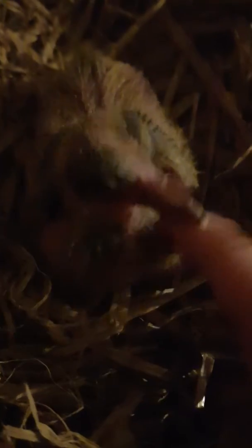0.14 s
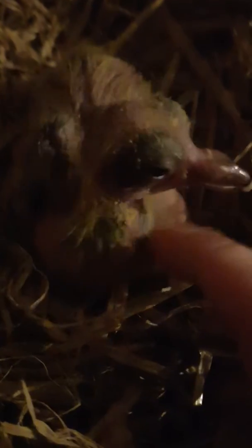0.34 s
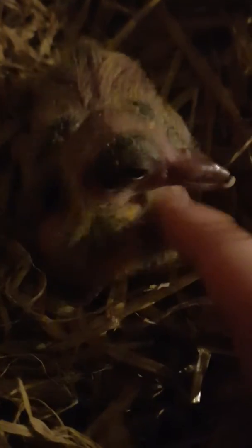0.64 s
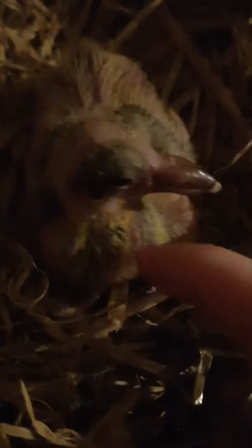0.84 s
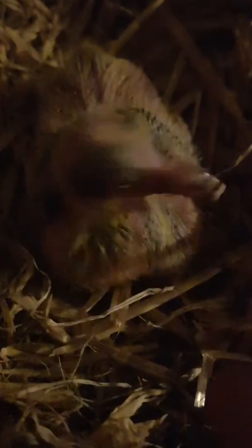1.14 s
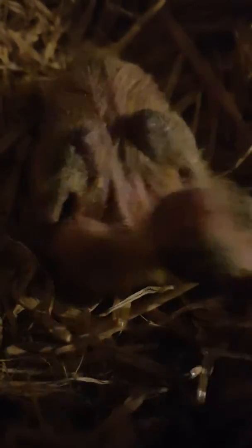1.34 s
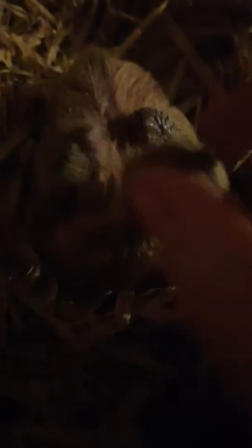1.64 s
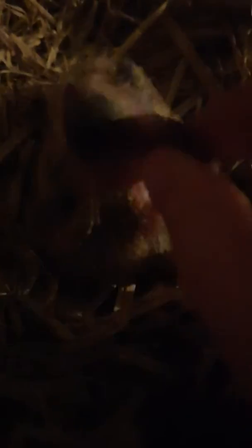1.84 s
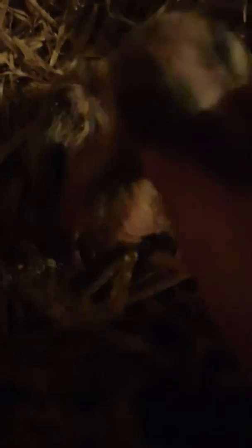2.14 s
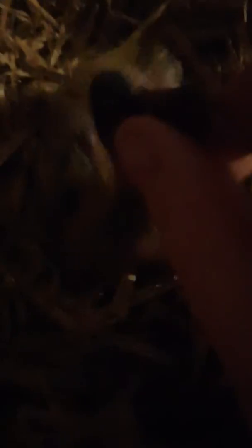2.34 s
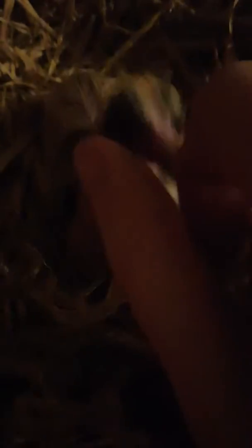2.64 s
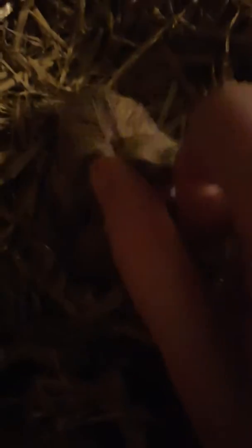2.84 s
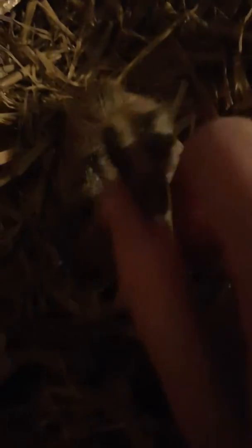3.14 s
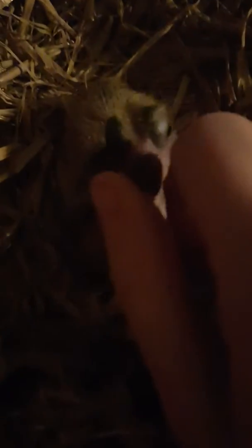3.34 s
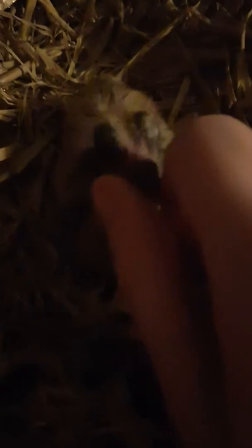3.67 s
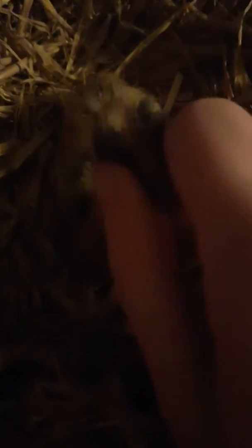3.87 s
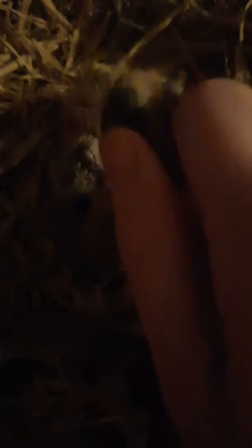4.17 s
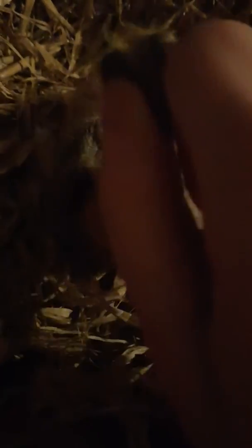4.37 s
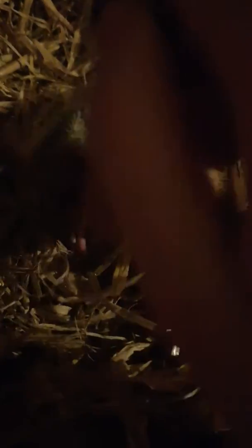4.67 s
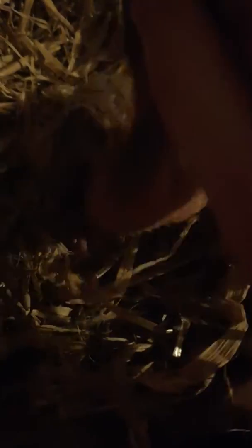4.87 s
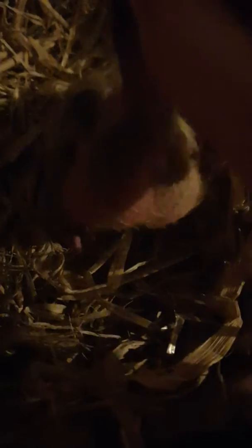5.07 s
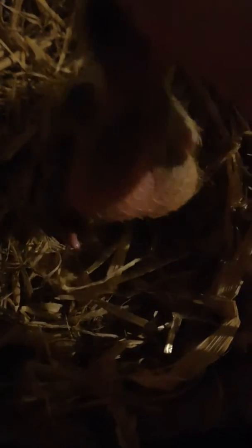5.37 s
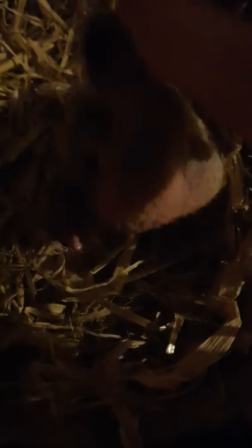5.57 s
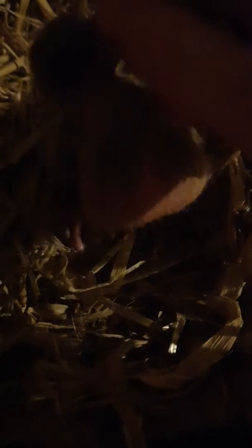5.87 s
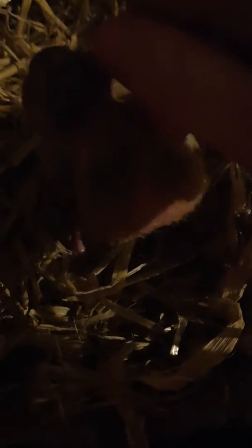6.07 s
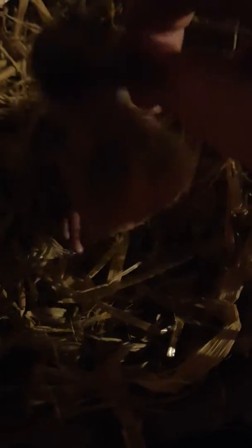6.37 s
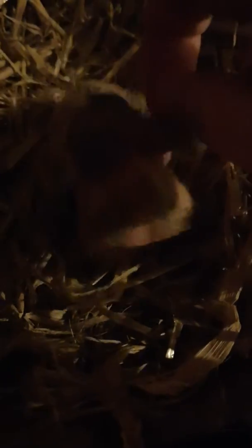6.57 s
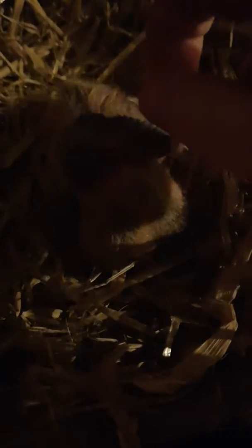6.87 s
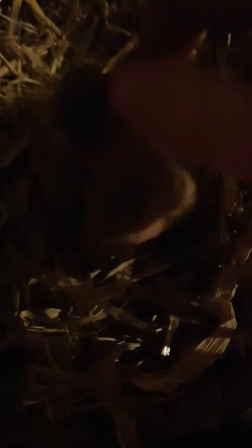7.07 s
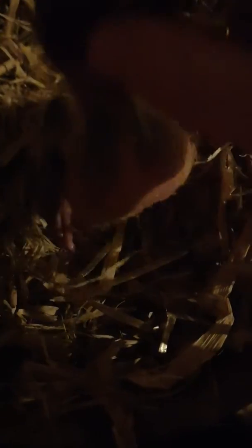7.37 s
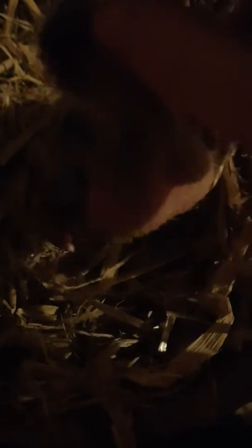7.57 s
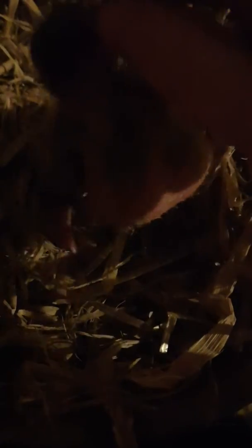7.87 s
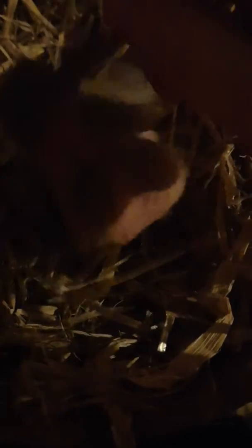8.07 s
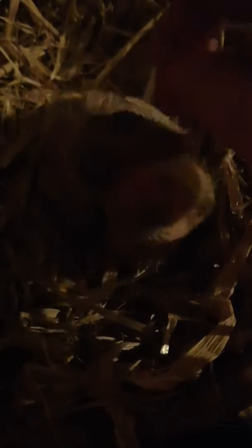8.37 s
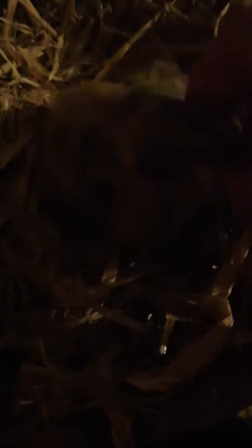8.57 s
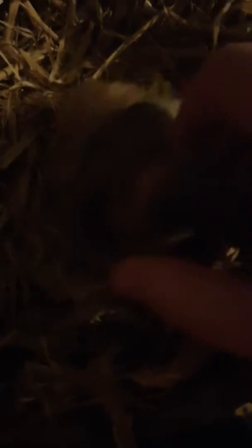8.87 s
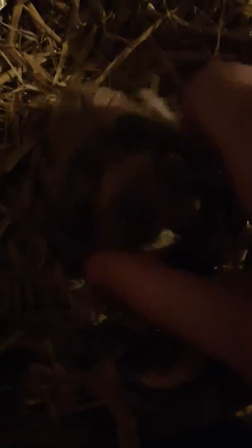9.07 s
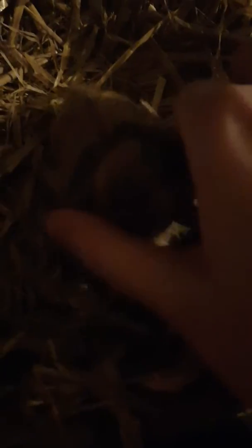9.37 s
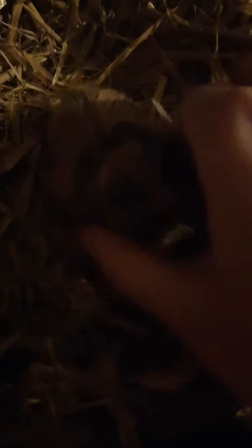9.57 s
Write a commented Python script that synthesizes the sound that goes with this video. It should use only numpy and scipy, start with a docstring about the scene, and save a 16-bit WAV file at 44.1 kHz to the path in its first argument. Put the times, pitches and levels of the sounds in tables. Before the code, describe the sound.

A pigeon chick squeaks close to the microphone in a small room, a little to the left, over a faint, steady machine drone. Each squeak is a high, thin, slightly hoarse peep of about a quarter second that rises, warbles and sags. One comes at 0.3 seconds; after a pause, a run starts at 1.2 seconds and carries on at about two a second until 8.9. The loudest fall around 1.7 to 2.3 seconds and just after 7, with softer ones near 5 and 8.3. A last brief, weak peep comes at 9.7 seconds. From about 1.5 seconds the straw nest crackles faintly as the chick shuffles, with short slides near 2.9, 3.5, 4 and 6.9 seconds. Small dry clicks occur near 2, 5, 6.6 and 8.7 seconds. A hand softly bumps the microphone around 2.2 to 2.4 seconds and again at 3.3.

```python
"""A pigeon chick squeaks in a straw nest in a small room, close to a phone held upright.
The two halves of its voice box (the syrinx) sound at once: they lock together, beat or turn hoarse.
A machine drones steadily in the background. Straw crackles and slides as the chick shuffles,
the beak or the straw gives short dry clicks, and now and then the hand bumps the phone.
The phone's two microphones give left and right."""
import sys
import numpy as np
from scipy import signal
from scipy.fft import rfft, irfft
from scipy.io import wavfile
from scipy.ndimage import uniform_filter1d

SR = 44100
rng = np.random.default_rng(int(sys.argv[2]) if len(sys.argv) > 2 else 0)


def master(y):
    """Save y as 16-bit WAV."""
    cut = np.clip(np.atleast_2d(y).T, -1, 1)
    pcm = np.round(cut * 32767)  # scale
    wavfile.write(sys.argv[1], SR, pcm.astype(np.int16))


N = 428652


def amp(db):
    return 10 ** (np.asarray(db) / 20)


def unit_rms(x):
    return x / np.sqrt(np.mean(abs(x) ** 2) + 1e-20)


def curve_at(points, hz):
    """Look up a table on a log-frequency axis."""
    f, value = np.transpose(points)
    return np.interp(np.log(hz + 1), np.log(f + 1), value)


def add(mix, start, sound):
    part = mix[..., round(start * SR):][..., :sound.shape[-1]]
    part += sound[..., :part.shape[-1]]


def wobble(size, hz):
    """A smooth random wiggle, about 1 in size, no faster than about hz."""
    lowpass = signal.butter(2, hz, fs=SR, output="sos")
    return unit_rms(signal.sosfilt(lowpass, rng.standard_normal(size + 999))[999:])


def band(x, hz, octaves):
    """Keep a bell-shaped band around hz."""
    f = np.fft.rfftfreq(x.shape[-1], 1 / SR) + 1
    return irfft(rfft(x) * np.exp(-.5 * (np.log2(f / hz) / octaves) ** 2), x.shape[-1])


def during(t, start, end):
    """1 from start to end, with soft edges."""
    return np.clip(np.minimum(t - start, end - t) / .004, 0, 1)


# Tone colour of the machine's noise: f/Hz, relative level/dB
DRONE_COLOUR = [(25, -18.5), (102, -10.5), (185, -7.5), (503, -14.5), (887, -12), (1370, -26),
                (1940, -23.5), (3100, -38), (4000, -36.5), (6300, -58), (8200, -59.5), (12500, -52),
                (16000, -46.5)]
# Humps on top of that noise: f/Hz, width/Hz, relative level/dB
DRONE_HUMPS = [(102.4, 7.5, -59.5), (506.3, 94, -49), (372.4, 120, -54.5)]
# How alike left and right are: f/Hz, likeness (0-1, capped below)
DRONE_LIKENESS = [(60, 1), (500, 0.92), (1000, 0.1), (2500, 0.033)]
# How much louder the left is: f/Hz, level/dB
DRONE_BALANCE = [(240, 0.5), (950, -2.5), (1900, -10), (4400, -17), (8000, 6.5), (15000, 6)]


def drone():
    """A machine makes steady airy noise, alike on both sides only in the bass."""
    frames, hz = N // 1024 + 5, np.fft.rfftfreq(4096, 1 / SR)
    a, b, c, d = rng.standard_normal((frames, 2049, 4)).T
    wash = amp(2 * curve_at(DRONE_COLOUR, hz))
    power = amp(-50) ** 2 * wash / wash.sum()
    for centre, width, db in DRONE_HUMPS:
        hump = 1 / (1 + (2 * (hz - centre) / width) ** 2) ** 2
        power += amp(db) ** 2 * hump / hump.sum()
    alike = np.clip(curve_at(DRONE_LIKENESS, hz), 0, .87)[:, None]
    left = a + 1j * b
    right = alike * left + np.sqrt(1 - alike ** 2) * (c + 1j * d)
    tilt = amp(curve_at(DRONE_BALANCE, hz) / 2)[:, None]
    delay = np.exp(-2j * np.pi * hz * 0.00025)[:, None]  # the machine is nearer the right side
    spectra = np.array([left * tilt * delay, right / tilt]) * np.sqrt(power[:, None] * 2 / (1 + alike))
    noise = signal.istft(spectra, nperseg=4096, noverlap=3072)[1][:, :N]
    return unit_rms(noise) * np.sqrt(power.sum()) * amp(-1.12)


# How strongly the nest crackles: t/s, relative level/dB
SHUFFLE_LEVELS = [(1.15, -74), (1.6, -61.5), (3.6, -70), (4.25, -61), (4.7, -69.5), (5.0, -63.5),
                  (6.05, -70.5), (6.53, -59.5), (6.95, -70.5), (7.5, -60.5), (8.4, -66), (8.999, -59.5),
                  (9.25, -73.5), (9.55, -65.5)]


def nest_shuffle():
    """The shuffling chick keeps the straw crackling finely, differently on each side."""
    grains = rng.standard_normal((2, N)) * amp(1.4 * wobble(N, hz=150))
    level_db = np.interp(np.arange(N) / SR, *np.transpose(SHUFFLE_LEVELS)) + 0.96 * wobble(N, hz=12)
    crackle = unit_rms(band(grains, hz=4480, octaves=0.4))
    fizz = unit_rms(band(grains, hz=11470, octaves=0.38))
    return amp(level_db) * (crackle + amp(-4.5) * fizz)


# Path of the upper voice, one list per squeak: t/s, level/dB, f/Hz
UPPER_WARBLES = [
    [(.277, -36.5, 4100), (.29, -34.5, 5140), (.33, -40, 5970), (.35, -35, 5470), (.375, -38.5, 6400),
     (.41, -30.5, 5300), (.445, -31.5, 5890), (.465, -32, 5300), (.49, -36, 6710), (.515, -27, 4900),
     (.532, -25, 4510)],
    [(1.263, -32.5, 4330), (1.29, -35.5, 4460), (1.325, -36.5, 5970), (1.345, -37, 5140),
     (1.39, -35.5, 5450), (1.415, -31.5, 5050), (1.44, -33.5, 6600), (1.465, -36, 5240), (1.495, -29, 5200),
     (1.515, -29.5, 4000)],
    [(1.685, -29, 4810), (1.705, -26, 4570), (1.735, -28, 4890), (1.758, -31, 4980), (1.775, -22, 5025),
     (1.8, -25, 5430), (1.82, -22, 4880), (1.845, -23, 5040), (1.882, -23.5, 4780), (1.915, -22.5, 5380),
     (1.942, -23.5, 4380)],
    [(2.102, -30, 3790), (2.12, -20.5, 4170), (2.135, -23, 4246), (2.159, -22, 4760), (2.176, -24.5, 4170),
     (2.233, -21, 4560), (2.267, -34, 6140), (2.291, -20.5, 4870), (2.313, -22, 5080), (2.335, -28.5, 4070)],
    [(2.587, -32.5, 4480), (2.62, -32, 4740), (2.635, -37.5, 5500), (2.66, -27.5, 4870),
     (2.675, -30.5, 5000), (2.695, -31, 4840), (2.725, -32, 5200), (2.742, -39.5, 5900),
     (2.765, -30.5, 4940), (2.79, -35.5, 5200), (2.845, -29.5, 5260), (2.858, -35.5, 4990)],
    [(3.192, -30.5, 4490), (3.21, -36, 5110), (3.225, -25.5, 4170), (3.28, -29, 4274), (3.3, -21.5, 4060),
     (3.328, -28.5, 4465), (3.342, -30, 3990), (3.375, -30, 4500), (3.39, -29.5, 4190)],
    [(3.752, -26, 4190), (3.785, -29.5, 4366), (3.8, -34.5, 4780), (3.816, -23.5, 4020), (3.884, -24, 4177),
     (3.912, -27, 4940), (3.934, -24, 4270), (3.98, -25, 4334), (4.022, -25, 4980), (4.038, -28.5, 3980)],
    [(4.36, -31, 4065), (4.383, -29.5, 4800), (4.412, -31.5, 3770), (4.452, -24.5, 4116),
     (4.52, -34.5, 3320), (4.57, -41, 3110)],
    [(5.05, -45.5, 3610), (5.108, -37.5, 3744), (5.15, -36, 4980), (5.172, -34, 4670), (5.2, -36.5, 5020),
     (5.246, -30.5, 4580), (5.262, -33.5, 4110), (5.274, -33.5, 3540)],
    [(5.592, -35, 3700), (5.612, -37, 4470), (5.66, -35, 5000), (5.685, -34, 4900), (5.697, -31.5, 4407),
     (5.75, -31.5, 4465), (5.785, -31, 5050), (5.8, -26, 4700), (5.826, -22, 4490), (5.844, -36.5, 3620)],
    [(6.2, -34.5, 4080), (6.235, -37, 4930), (6.29, -32, 4940), (6.32, -34.5, 4700), (6.35, -26, 4930),
     (6.38, -27, 5280), (6.405, -21.5, 4810), (6.422, -22, 3930)],
    [(6.59, -28.5, 4240), (6.608, -32.5, 4890), (6.628, -25, 4185), (6.662, -25, 4610), (6.685, -29, 4360),
     (6.726, -27, 4910), (6.742, -23.5, 4500), (6.8, -27.5, 5120), (6.82, -23.5, 4720)],
    [(7.107, -39.5, 3910), (7.124, -28.5, 4030), (7.14, -30.5, 4750), (7.194, -31.5, 4810),
     (7.208, -21, 4080), (7.246, -18.5, 4120), (7.275, -20.5, 4340), (7.308, -24.5, 4795),
     (7.342, -19, 4456), (7.37, -22, 4930), (7.392, -26, 4060)],
    [(7.618, -30.5, 4230), (7.632, -28.5, 4060), (7.658, -28.5, 4630), (7.69, -28.5, 4000),
     (7.78, -26, 4850), (7.8, -26, 4430), (7.85, -23, 4950), (7.878, -30, 3724)],
    [(8.275, -34, 4090), (8.305, -43, 5190), (8.333, -36, 4680), (8.356, -39.5, 5770), (8.38, -32.5, 4960),
     (8.419, -31.5, 5030), (8.441, -28, 3825)],
    [(8.627, -30.5, 4010), (8.685, -24, 4720), (8.709, -30.5, 5280), (8.733, -28, 4710),
     (8.755, -31.5, 5390), (8.795, -28.5, 4970), (8.82, -32.5, 5370), (8.845, -31.5, 5020),
     (8.875, -28.5, 5250), (8.897, -31, 4770)],
    [(9.677, -34.5, 4100), (9.695, -39, 5100), (9.716, -42, 5800)],
]
# The lower voice breaks away: start t/s, end t/s, first f/Hz, last f/Hz,
# share of the warble it follows, level/dB over the upper voice
LOWER_BREAKAWAYS = [(0.285, 0.522, 4380, 4860, 0.014, 7), (1.292, 1.506, 4640, 4810, 0.066, -5),
                    (1.762, 1.897, 4494, 4624, 0.82, 9.5), (1.926, 1.961, 4075, 4010, 0.84, 4),
                    (2.135, 2.183, 4260, 4210, 0.19, -14), (2.242, 2.338, 4360, 4570, 0.015, -9.5),
                    (2.612, 2.844, 4490, 4925, 0.022, -2), (3.178, 3.231, 4200, 4030, 0.047, -1),
                    (3.32, 3.345, 4110, 4000, 0.4, -4), (3.787, 3.816, 4420, 4260, 0.055, -6),
                    (3.89, 3.931, 4350, 4350, 0.47, -6), (3.978, 4.043, 4260, 4200, 0.39, -5),
                    (4.349, 4.391, 4195, 4170, 0.63, 3), (5.118, 5.233, 4430, 4440, 0.32, 4),
                    (5.614, 5.694, 4345, 4344, .05, -4), (5.742, 5.799, 4460, 4810, 0.055, -5),
                    (6.244, 6.412, 4380, 4540, 0.333, -5), (6.596, 6.621, 4420, 4375, 0.63, -7),
                    (7.127, 7.204, 4250, 4220, 0.036, 1), (7.291, 7.311, 4400, 4465, 0.35, -4),
                    (7.354, 7.409, 4440, 3555, 0.97, -1), (7.602, 7.883, 4020, 4085, 0.75, -3),
                    (8.292, 8.441, 4224, 4400, 0.018, -4), (8.706, 8.9, 4390, 4370, 0.074, -10.5),
                    (9.68, 9.756, 4280, 4200, 0.022, 3)]


def voices(start, end, start_hz, end_hz, warble):
    """The upper voice climbs, warbles and sags; the lower trails it faintly unless it breaks away."""
    times, db, hz = np.transpose(warble)
    t = np.arange(start, end, 1 / SR)
    rise = np.clip((times[0] - t) / (times[0] - start), 0, 1) ** 0.94
    fall = np.clip((t - times[-1]) / (end - times[-1]), 0, 1) ** 0.94
    level_db = np.interp(t, times, db) - 17.5 * rise - 15 * fall
    upper_hz = np.interp(t, times, hz) + (start_hz - hz[0]) * rise + (end_hz - hz[-1]) * fall
    locked_gap_hz, locked_db, parting_s = 250, -33., .01
    lower_hz, lower_db = upper_hz - locked_gap_hz, np.full(len(t), locked_db)
    for a, b, first_hz, last_hz, follow, apart_db in LOWER_BREAKAWAYS:
        apart = np.clip(np.minimum(t - a, b - t) / parting_s, 0, 1)
        if apart.any():
            swing_hz = upper_hz - upper_hz[apart > 0].mean()
            own_hz = np.interp(t, [a, b], [first_hz, last_hz]) + follow * swing_hz
            lower_hz += apart * (own_hz - lower_hz)
            lower_db += apart * (apart_db - locked_db)
    return t, level_db, upper_hz, lower_hz, lower_db


def membrane_phase(hz, hoarse, drift_hz, rasp_hz):
    """A membrane swings with a drifting pitch that shakes more when hoarse."""
    drift = drift_hz * wobble(len(hz), hz=40)
    shake = rasp_hz * hoarse ** 2 * wobble(len(hz), hz=250)
    return 2 * np.pi * np.cumsum(hz + drift + shake) / SR


def windpipe(flow, upper_hz, lower_hz, lower_db):
    """The windpipe passes little below the lowest strong voice."""
    floor_hz = upper_hz - np.clip(amp(lower_db + 13), 0, 1) * np.maximum(upper_hz - lower_hz, 0)
    floor_tone = np.exp(2j * np.pi * np.cumsum(floor_hz) / SR)
    below = np.clip(-np.fft.fftfreq(len(flow), 1 / SR) / 260 - 1, 0, 1)
    return floor_tone * np.fft.ifft(np.fft.fft(flow / floor_tone) * amp(-18 * below))


# A thin third tone joins the two voices: start t/s, end t/s, f/Hz, relative level/dB
THIRD_TONES = [(0.276, 0.387, 5200, -12), (6.273, 6.342, 5850, -3.5)]
# The voice catches and stutters: start t/s, end t/s
VOICE_CATCHES = [(.468, .48), (1.674, 1.69), (1.726, 1.768), (2.15, 2.166), (3.709, 3.73), (5.031, 5.13),
                 (6.573, 6.587), (6.598, 6.611), (6.704, 6.74), (6.752, 6.815), (7.296, 7.312),
                 (7.36, 7.392)]
# Strong and weak swings alternate, adding in-between tones: start t/s, end t/s, relative level/dB
UNEVEN_SWINGS = [(2.142, 2.23, -26), (7.194, 7.283, -20.5)]


def squeak(t, level_db, upper_hz, lower_hz, lower_db, second_db, third_db, rasp):
    """Two membranes chop one stream of air like a valve, making overtones and mixed tones."""
    size, effort_db = len(t), level_db - level_db.max()
    stutter_hz, stutter_depth = 240, .9
    # Muscles round off the pitch corners.
    upper_hz, lower_hz = (uniform_filter1d(hz, 240, mode="nearest") for hz in (upper_hz, lower_hz))
    catch = stutter_depth * sum(during(t, a, b) for a, b in VOICE_CATCHES)
    # Voices of like strength fight over the air, in fits.
    fight = np.clip(amp(12 - abs(lower_db)), .27, 1) * amp(2.5 * wobble(size, hz=25))
    ragged_start = np.exp((t[0] - t) / .015)
    hoarse = rasp * (fight + catch / 2 + ragged_start)

    upper = membrane_phase(upper_hz, hoarse, drift_hz=26, rasp_hz=500)
    lower = membrane_phase(lower_hz, hoarse, drift_hz=45, rasp_hz=550)
    flow = (np.exp(1j * upper) + amp(lower_db) * np.exp(1j * lower)) / np.sqrt(1 + amp(2 * lower_db))
    eddies = (wobble(size, hz=444) + 1j * wobble(size, hz=483)) * np.exp(2j * np.pi * 500 * t)
    flow *= 1 + (.015 + .45 * hoarse) * eddies  # swirling air adds noise just above the pitch
    flow *= np.exp(.4j * abs(flow) ** 2) / (abs(flow) + .1) ** .25  # big swings run sharp, grow less
    for a, b, hz, db in THIRD_TONES:
        phase = 2 * np.pi * np.cumsum(hz + 70 * wobble(size, hz=30)) / SR
        flow += amp(db) * during(t, a, b) * np.exp(1j * phase)
    puff = np.cumsum(stutter_hz * amp(3 * wobble(size, hz=60))) / SR % 1
    flow *= 1 + catch * uniform_filter1d(1 - 2 * puff, 30) * np.exp(.6j)  # each puff bursts, then sags
    flow = windpipe(flow, upper_hz, lower_hz, lower_db)

    uneven = sum(amp(db) * during(t, a, b) for a, b, db in UNEVEN_SWINGS)
    between_tones = uneven * (np.exp(1.5j * upper) + .4 * np.exp(2.5j * upper))
    snap = amp(2.7 * wobble(size, hz=30) + 0.17 * effort_db)  # the valve snaps harder with effort
    valve = flow / np.sqrt(abs(flow) + .1)  # it shuts fully on big swings
    overtones = amp(second_db) * valve ** 2 + amp(third_db) * valve ** 3 * (1 + amp(-15) * valve)
    overtones *= .3 + .7 * signal.windows.tukey(size, .3)  # slack membranes hardly shut at either end
    tone = np.sqrt(2) * (flow + between_tones + snap * overtones).real
    gap_noise = band(rng.standard_normal(size), hz=10500, octaves=0.7)  # air in the narrow gap
    hiss = amp(-15.5 - effort_db / 2) * hoarse * gap_noise
    return amp(level_db) * (tone + hiss) * signal.windows.tukey(size, .04)


# One row per squeak: start t/s, end t/s, start f/Hz, end f/Hz, left-over-right level/dB before shading,
# right delay/ms, base level/dB of the 2nd harmonic, same for the 3rd
CHICK_SQUEAKS = [(0.263, 0.548, 2670, 3520, 16.5, 0.19, -13, -19),
                 (1.238, 1.525, 3460, 3420, 9.5, 0.19, -10, -16),
                 (1.671, 1.956, 3670, 3630, 10, .25, -10.5, -17),
                 (2.082, 2.347, 3110, 3200, 12.5, 0.27, -11, -15),
                 (2.559, 2.879, 3290, 3480, 2, 0.19, -9.5, -19.5),
                 (3.164, 3.416, 3050, 3080, 7, 0.2, -6.5, -18),
                 (3.709, 4.048, 3400, 3000, 5.5, 0.19, -11.5, -20),
                 (4.336, 4.586, 2880, 2770, 6.5, 0.22, -17, -15.5),
                 (5.031, 5.282, 3110, 3390, 8.5, 0.34, -19.5, -6.5),
                 (5.579, 5.854, 3050, 3470, 2, 0.29, -12, -22),
                 (6.186, 6.424, 3250, 3280, 6.5, 0.28, -12, -21),
                 (6.574, 6.844, 3350, 3620, 5, 0.21, -13, -19),
                 (7.094, 7.404, 3260, 3830, 3.5, 0.3, -4, -14.5),
                 (7.588, 7.893, 3035, 3100, 4.5, 0.29, -10, -11),
                 (8.249, 8.448, 2770, 3400, 4, 0.21, -10, -21),
                 (8.602, 8.919, 3550, 3660, 3.5, 0.22, -11.5, -16),
                 (9.663, 9.763, 3400, 3500, 2.5, -0.15, -16, -26)]
# How easily each squeak turns hoarse (0-1)
HOARSENESS = [.17, .33, .09, .2, .28, .26, .19, .3, .36, .4, .26, .2, .24, .13, .2, .33, .25]
# Tone colour of windpipe and beak: f/Hz, level/dB
THROAT_COLOUR = [(5300, 0), (7000, 1.5), (9200, -0.5), (11600, -1), (13800, 2.5)]
# Shading at the right microphone: f/Hz, level/dB
RIGHT_SHADING = [(2000, 5), (5200, 7), (7000, -12), (9000, -17), (12000, -5.5), (15000, -6.5)]


def chick():
    """Each squeak leaves the beak and reaches the two microphones with its own delay and balance."""
    out, pad = np.zeros((2, N)), 64
    for row, warble, rasp in zip(CHICK_SQUEAKS, UPPER_WARBLES, HOARSENESS):
        start, end, start_hz, end_hz, left_db, lag_ms, second_db, third_db = row
        paths = voices(start, end, start_hz, end_hz, warble)
        call = np.pad(squeak(*paths, second_db, third_db, rasp), pad)
        hz = np.fft.rfftfreq(len(call), 1 / SR)
        left = irfft(rfft(call) * amp(curve_at(THROAT_COLOUR, hz)), len(call))
        delay = np.exp(-2j * np.pi * hz * lag_ms / 1000)
        right = irfft(rfft(left) * amp(curve_at(RIGHT_SHADING, hz)) * delay, len(call))
        pair = np.array([left, amp(-left_db) * right]) / np.sqrt((1 + amp(-2 * left_db)) / 2)
        add(out, start - pad / SR, pair)
    return out


# Short dry clicks: t/s, peak level/dB before the left and right gains, centre f/Hz
SHARP_CLICKS = [(2.0855, -32, 3900), (5.1, -34, 7500), (6.5733, -35, 4900), (9.3577, -41, 4000),
                (8.703, -37, 2700), (4.955, -46, 11000), (2.555, -44, 5900)]


def sharp_clicks():
    """Short dry clicks from the beak or the straw, each a tiny burst of noise."""
    out = np.zeros((2, N))
    decay = amp(-60 * np.arange(512) / SR / 0.017)
    for start, db, hz in SHARP_CLICKS:
        click = band(rng.standard_normal((2, 512)) * decay, hz, octaves=0.53)
        add(out, start, amp(db) * click / abs(click).max() * amp([[2], [-6]]))
    return out


# Bumps on the phone's body: t/s, peak level/dB, f/Hz
HAND_BUMPS = [(2.175, -34.5, 177), (2.215, -40.5, 99), (2.381, -40, 101), (3.269, -37.5, 140)]


def hand_bumps():
    """The hand knocks the phone: short low thuds, the same on both sides."""
    out, t = np.zeros(N), np.arange(-.03, .03, 1 / SR)
    for when, db, hz in HAND_BUMPS:
        swell = np.exp(-.5 * (t * hz / 0.6) ** 2)
        add(out, when + t[0], amp(db) * np.cos(2 * np.pi * hz * t) * swell)
    return out


# Stalks sliding: start t/s, length/s, level/dB before the fade and side gains, centre f/Hz
STRAW_SLIDES = [(2.849, 0.1, -53, 2510), (3.489, 0.075, -51, 2950), (3.997, 0.086, -45, 2570),
                (4.983, 0.078, -58, 11000), (5.393, 0.027, -54, 4140), (6.844, 0.13, -53.5, 2820)]


def straw_slides():
    """Sliding stalks crackle in clumps and fade away."""
    out = np.zeros((2, N))
    for start, length, db, hz in STRAW_SLIDES:
        size = int(length * SR)
        grains = rng.standard_normal((2, size)) * amp(3.1 * wobble(size, hz=400))
        fade = np.minimum(np.arange(size) / (0.023 * size), 1) * np.linspace(1, 0, size)
        add(out, start, amp(db) * unit_rms(band(grains, hz, octaves=1.0)) * fade * amp([[2], [-3]]))
    return out


def echoes(sound, decay_s, first_sample):
    """Scattered echoes fall 60 dB in decay_s; straw and walls soften the highs and the bass."""
    taps, at = np.zeros((2, SR // 2)), np.arange(first_sample, SR // 2 - 20, 20)
    at = at + rng.integers(0, 20, (2, len(at)))
    np.put_along_axis(taps, at, rng.choice([-1., 1.], at.shape) * amp(-60 * at / SR / decay_s), 1)
    taps = band(taps / np.linalg.norm(taps[0]), hz=4580, octaves=4.8)
    return signal.fftconvolve(sound, taps, axes=1)[:, :N]


def scene():
    """Mix everything; squeaks, clicks and slides echo in the room and the nest."""
    near = chick() + sharp_clicks() + straw_slides()
    room = amp(-16.5) * echoes(near, decay_s=0.23, first_sample=300)
    nest = amp(-11) * echoes(near, decay_s=0.01, first_sample=40)
    return near + room + nest + nest_shuffle() + hand_bumps() + drone()


def record(dry):
    """The phone cuts off the highest treble."""
    lowpass = signal.firwin(511, cutoff=15900, window=("kaiser", 9), fs=SR)
    return signal.oaconvolve(dry, lowpass[None], "same")


dry = scene()
out = record(dry)
master(out)
```